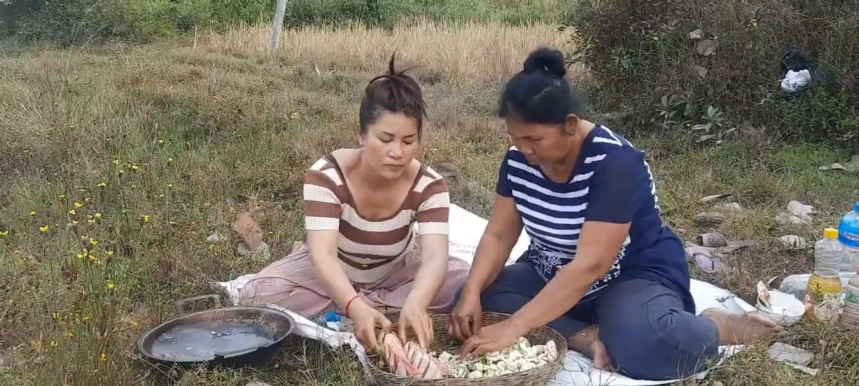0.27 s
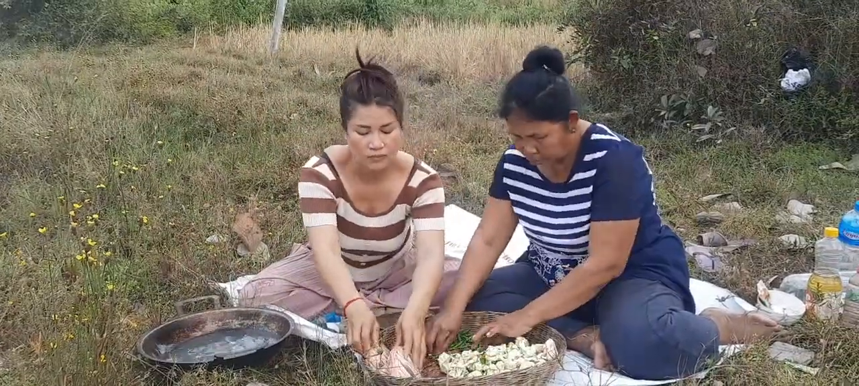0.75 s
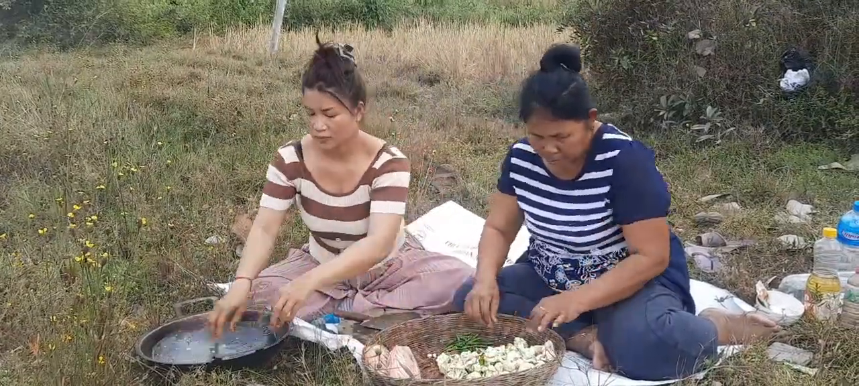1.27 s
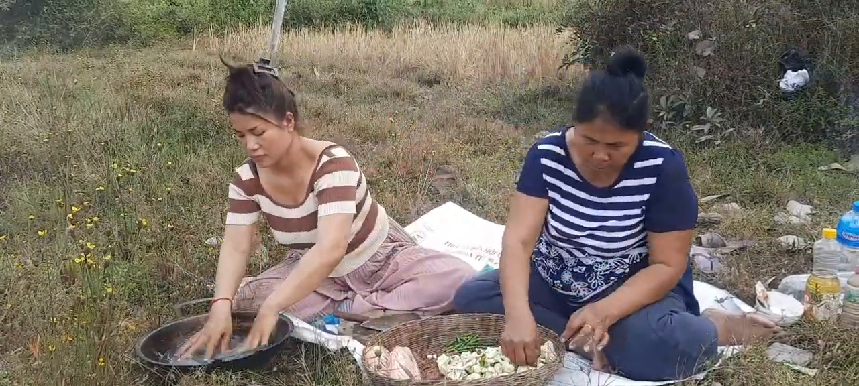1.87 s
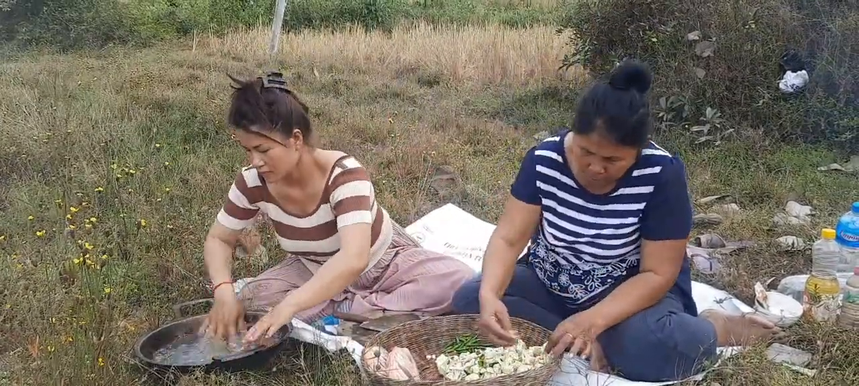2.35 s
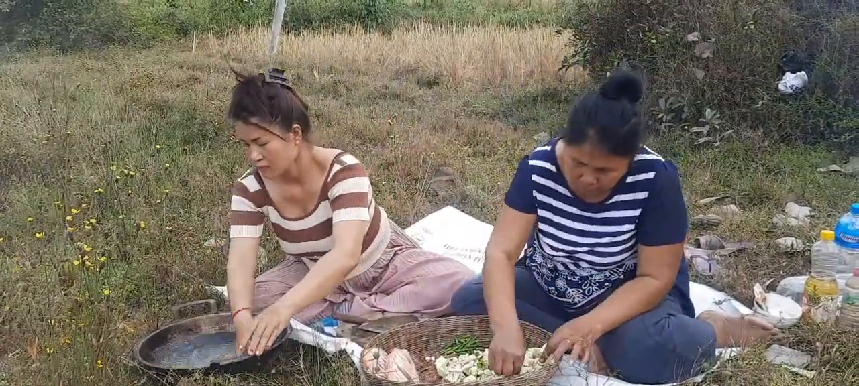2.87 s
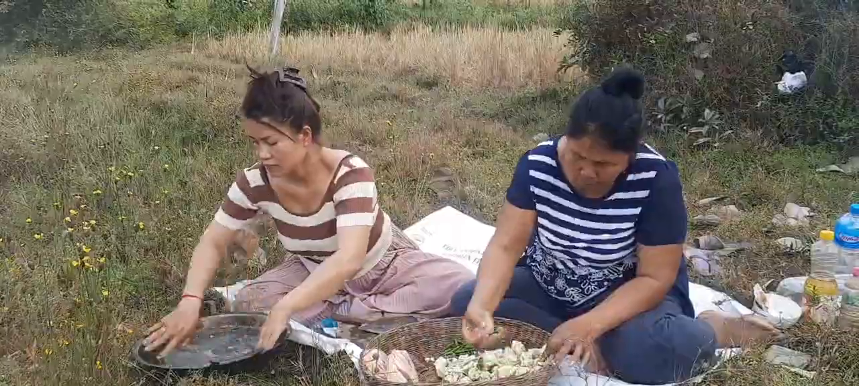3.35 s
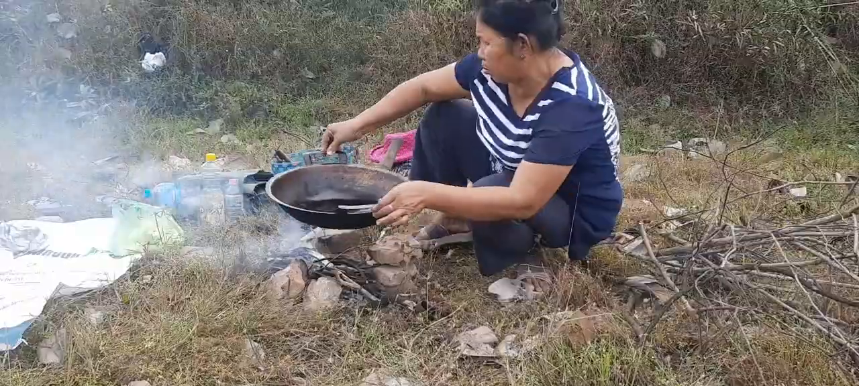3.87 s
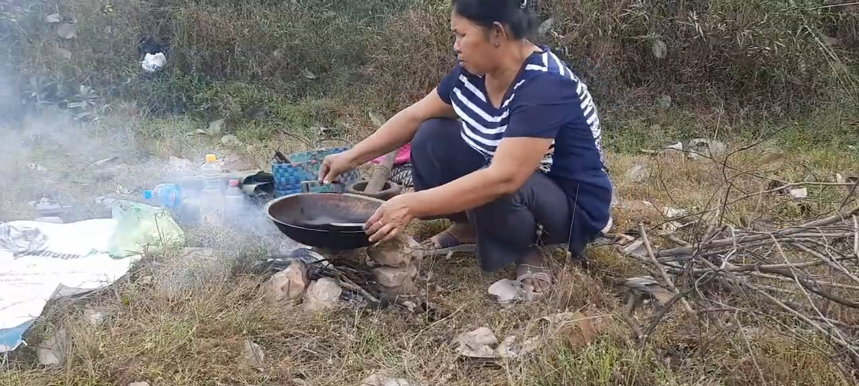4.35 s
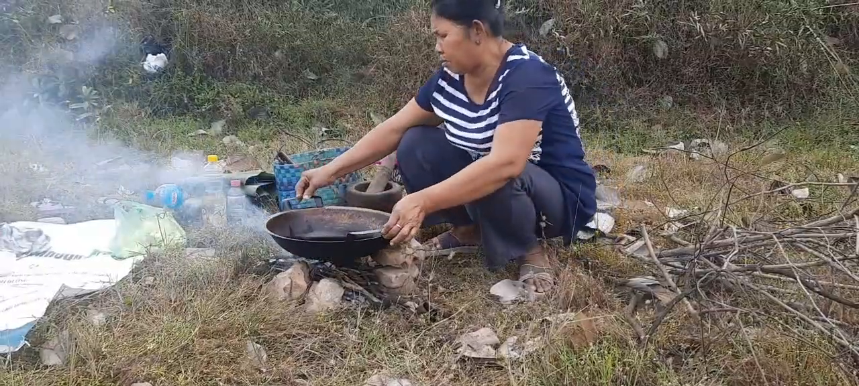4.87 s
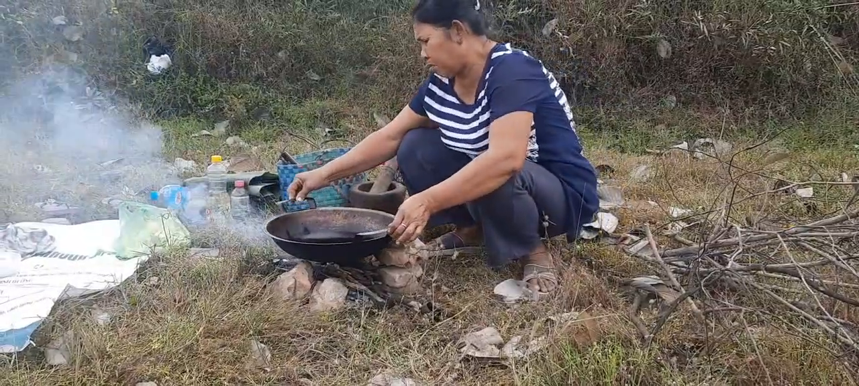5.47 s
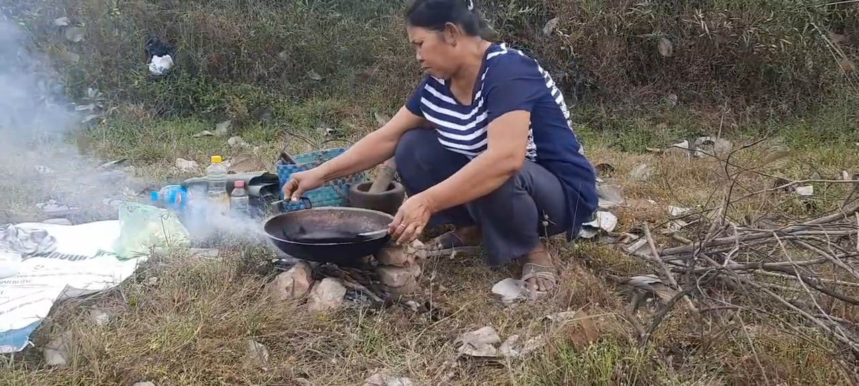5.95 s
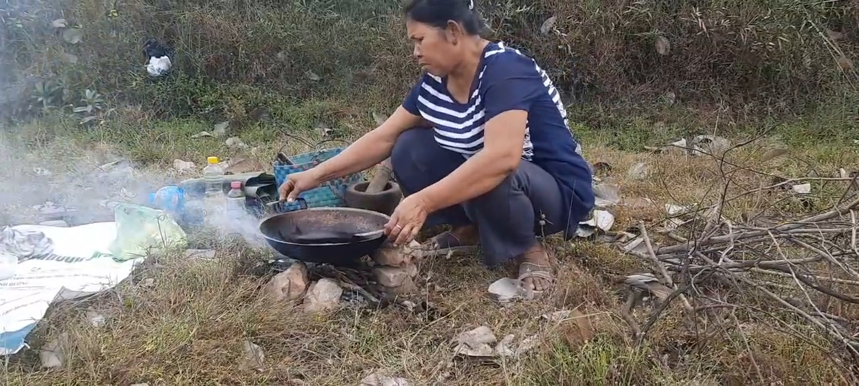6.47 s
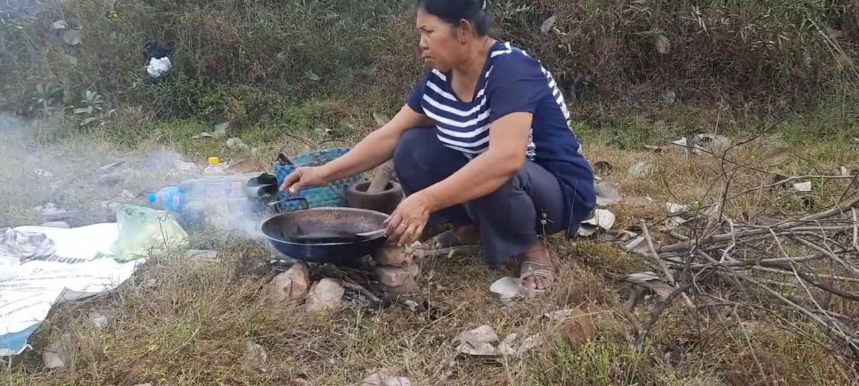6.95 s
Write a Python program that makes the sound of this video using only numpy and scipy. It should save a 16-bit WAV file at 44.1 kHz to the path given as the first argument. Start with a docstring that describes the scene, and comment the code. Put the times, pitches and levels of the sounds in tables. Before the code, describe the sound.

Faint splashing and a bird outdoors, then a small engine thuds nearby while a fire crackles and wind buffets the microphone.

```python
"""Outdoors in a field: hands wash food in a pan, ringing bubbles and the pan's modes, while a bird
whistles over a far hum. After a short silence a second scene begins: the exhaust pulses of a slow
single-cylinder engine thud nearby and swell, twigs crackle in a cooking fire, a pan is set down on
stones and one brief high chirp sounds. In both scenes turbulent wind buffets the microphone's
two ports and a cricket trills with fast wing strokes."""
import sys
import numpy as np
from scipy import signal
from scipy.fft import rfft, irfft
from scipy.io import wavfile
from scipy.ndimage import uniform_filter1d

SR = 44100
rng = np.random.default_rng(int(sys.argv[2]) if len(sys.argv) > 2 else 0)


def pcm_store(signal):
    """Save signal as 16-bit PCM."""
    levels = np.round(np.clip(np.atleast_2d(signal), -1, 1) * 32767)
    wavfile.write(sys.argv[1], SR, levels.astype(np.int16).T)


N = 318402
T = np.arange(N) / SR

HANDS_IN_S, FIRST_END_S, SECOND_START_S = 1.36, 3.7205, 3.7935
FIRST, SECOND = T < FIRST_END_S, T > SECOND_START_S
FIRING_HZ = 19.288
BARK_FROM, KNOCK_FROM, TICK_FROM = 9, 19, 45   # lowest order of each exhaust band
PORT_LAG_S = .00014   # sound from the left reaches the right port later
GUST_EDGE_DB = 21.5   # fall of a gust or flutter, one flank away from its peak
# Harmonic spectrum of the exhaust: order (multiple of the firing rate), relative_db
EXHAUST_ORDERS = [(1, -38), (2, -21), (3, -5), (4, -6), (5, -6), (6, 0), (7, -3), (8, 0), (9, -17),
                  (10, -13), (11, -9), (12, -17), (13, -17), (14, -11), (15, -15), (16, -16), (17, -20),
                  (18, -32), (19, -32), (20, -32), (21, -29), (22, -31), (23, -33), (24, -28), (25, -31),
                  (26, -35), (27, -38), (28, -40), (29, -40), (30, -36), (31, -29), (32, -33), (33, -29),
                  (34, -22), (35, -27), (36, -25), (37, -28), (38, -34), (39, -35), (40, -39), (41, -39),
                  (42, -38), (43, -38), (44, -40), (45, -42), (46, -40), (47, -44), (48, -39), (49, -39),
                  (50, -41), (51, -38), (52, -28), (53, -34), (54, -32), (55, -32), (56, -33), (57, -31),
                  (58, -34), (59, -33), (60, -33), (61, -33), (62, -37), (63, -37), (64, -30), (65, -38),
                  (66, -35)]


def amp(db):
    """Decibels to amplitude ratio."""
    return 10 ** (np.asarray(db) / 20)


def rms_one(x):
    """Normalise to unit rms."""
    return x / np.sqrt(np.mean(x ** 2) + 1e-20)


def in_time(rows):
    """Linear interpolation in time: one curve for each column after the first."""
    times, *columns = np.transpose(rows)
    return [np.interp(T, times, column) for column in columns]


def at_hz(points, hz):
    """Interpolation on a logarithmic frequency axis."""
    known_hz, values = np.transpose(points)
    return np.interp(np.log(hz), np.log(known_hz), values)


def drift(rate_hz):
    """Random modulation: low-passed noise of unit rms."""
    pole = np.exp(-80 * np.pi * rate_hz / SR)
    white = rng.standard_normal(N // 40 + 2002)
    slow = signal.lfilter([1], [1, -2 * pole, pole * pole], white)[2000:]
    return np.interp(np.arange(N) / 40, np.arange(len(slow)), rms_one(slow))


def panned(x, pan_db):
    """Level difference between channels; positive is to the left."""
    return np.array([x * amp(pan_db / 2), x * amp(-pan_db / 2)])


def filtered(x, hz, kind="low", order=2):
    """Maximally flat low-pass or high-pass filter."""
    return signal.sosfilt(signal.butter(order, hz, kind, fs=SR, output="sos"), x)


def noise(spectrum, coherence=None):
    """Coloured stereo noise; by default the coherence of the ports falls with frequency."""
    # Likeness of the sound at the two ports: frequency_hz, coherence
    port_coherence = [(60, .97), (290, .95), (640, .75), (1400, .55), (3000, .45), (6000, .4), (15000, .25)]
    # Level difference between the ports: frequency_hz, pan_db
    port_balance = [(60, -2), (180, 11.5), (550, 4.5), (1650, 2.5), (4970, -0.5), (15000, -2.5)]
    hz = np.maximum(np.arange(N // 2 + 1) * SR / N, 1)
    mid, side = rfft(rng.standard_normal((2, N))) * amp(at_hz(spectrum, hz))
    if coherence is None:
        alike = np.clip(at_hz(port_coherence, hz), 0, 1)
        mid, side = np.sqrt(1 + alike) * mid, np.sqrt(1 - alike) * side
        lean = amp(at_hz(port_balance, hz) / 2)
        delay = np.exp(-2j * np.pi * hz * PORT_LAG_S)
        return rms_one(irfft([(mid + side) * lean, (mid - side) / lean * delay], N))
    mid, side, alike = irfft(mid, N), irfft(side, N), np.clip(coherence, 0, 1)
    return rms_one(np.sqrt(1 + alike) * mid + np.sqrt(1 - alike) * side * [[1], [-1]])


def add(out, start_s, piece):
    """Superpose a short sound on the output."""
    i = int(start_s * SR)
    out[..., i:i + piece.shape[-1]] += piece[..., :N - i]


def resonate(x, hz, width_hz, stages=1):
    """Two-pole resonators in cascade, with unit gain at the peak."""
    r = np.exp(-np.pi * width_hz / SR)
    feedback = [1, -2 * r * np.cos(2 * np.pi * hz / SR), r * r]
    for _ in range(stages):
        x = signal.lfilter([(1 - r * r) / 2, 0, (r * r - 1) / 2], feedback, x)
    return x


def held(rows, fall_db_per_s, attack_s=.026):
    """Envelopes that rise, hold and decay, summed in power; rows of start_s, length_s, level_db."""
    power = 0
    for start_s, length_s, db in rows:
        onset = np.clip((T - start_s) / attack_s + 1, 0, 1)
        power += (onset * amp(db - fall_db_per_s * np.maximum(T - start_s - length_s, 0))) ** 2
    return np.sqrt(power)


def damped_sine(hz, cycles, rise, attack_cycles):
    """A damped oscillator: it loses 60 dB over its cycles while its pitch climbs by the share 2 * rise."""
    t = np.arange(int(cycles / hz * SR)) / SR
    envelope = np.exp(-np.log(1000) * t * hz / cycles) * np.minimum(t * hz / attack_cycles, 1)
    return envelope * np.sin(2 * np.pi * hz * (t + rise * t * t * hz / cycles))


def engine():
    """Periodic firing drives exhaust and clatter, which swell as the wind carries the sound over."""
    # Swell and levels of the pipe note (order 8) and low note (order 6): time_s, swell_db, note_db, low_db
    carried_levels = [(3.79, -5, -46, -47), (4.2, -4, -44.5, -49), (4.64, -4, -44.5, -49),
                      (4.8, 1, -44.5, -44.5), (5.25, 5, -35.5, -41), (5.56, 7, -36, -37),
                      (5.8, 6, -45, -38.5), (6.05, 4, -40, -39), (6.3, 2.2, -38, -44), (6.6, 3, -44, -38.5),
                      (6.78, 2.5, -39, -37), (7.05, 1.5, -41, -40), (7.22, 2, -38, -45)]
    # Strength of the exhaust knock: time_s, level_db
    knock_levels = [(3.79, -60), (4.4, -62), (4.75, -64), (5.25, -56), (5.75, -54), (5.97, -61), (6.3, -65),
                    (7.22, -66)]
    swell_db, note_db, low_db = in_time(carried_levels)
    bands = {   # orders, level_db
        "deep": (range(1, 5), -54 + 1.12 * swell_db),
        "boom": ((5, 7), -46.5 + .9 * swell_db),
        "low note": ((6,), low_db),
        "pipe note": ((8,), note_db),
        "bark": (range(BARK_FROM, KNOCK_FROM), -47 + .6 * swell_db),
        "knock": (range(KNOCK_FROM, TICK_FROM), in_time(knock_levels)[0]),
        "tick": (range(TICK_FROM, 67), -64 + .76 * swell_db)}
    cycles = (T - 4.3179) * FIRING_HZ + .0008 * drift(3)   # a whole number at each firing
    metal = amp(-53.5 + .64 * swell_db) * clatter(cycles)
    pipe = panned(exhaust(cycles, bands), 1.0)
    pipe[1] = np.roll(pipe[1], int(PORT_LAG_S * SR))
    return pipe + metal


def exhaust(cycles, bands):
    """A pulse train is a harmonic series; each order wavers in level, the higher ones more in phase."""
    waver = [drift(3) for _ in range(9)]
    scatter = rng.standard_normal(len(EXHAUST_ORDERS))   # ground echoes blur the top of the pulse
    harmonics = {}
    for (k, db), phase, blur in zip(EXHAUST_ORDERS, exhaust_phases(), scatter):
        jitter = .005 * k * waver[(k + 4) % 9] + .012 * k * blur
        harmonics[k] = amp(db + 1.5 * waver[k % 9]) * np.cos(2 * np.pi * k * cycles + phase + jitter)
    uneven = amp(1.6 * drift(15))   # no two firings knock alike
    out = 0
    for name, (orders, level_db) in bands.items():
        band = sum(harmonics[k] for k in orders)
        if name in ("knock", "tick"):
            band *= uneven
        out += amp(level_db) * rms_one(band)
    return out


def exhaust_phases(size=4096, bins_per_order=16):
    """Phase of each order, in radians: a minimum-phase pulse, dispersed by the pipe."""
    orders, db = np.transpose([(0, -60)] + EXHAUST_ORDERS + [(80, -60)])
    spectrum_db = np.interp(np.arange(size // 2 + 1) / bins_per_order, orders, db)
    cepstrum = irfft(np.log(amp(spectrum_db)), size)
    cepstrum[1:size // 2] *= 2   # folding onto positive time gives minimum phase
    cepstrum[size // 2 + 1:] = 0
    period = size / bins_per_order
    with_intake = cepstrum.copy()
    with_intake[int(.26 * period):int(.43 * period)] *= -1   # the intake thumps ahead of each firing
    k = orders[1:-1]
    intake_phase, causal_phase = rfft([with_intake, cepstrum]).imag[:, (bins_per_order * k).astype(int)]
    pulse = np.where((k >= BARK_FROM) & (k < TICK_FROM), intake_phase, causal_phase)
    sixth_lag_s, knock_lag_cycles = .022, .058
    dispersion = np.pi * FIRING_HZ * sixth_lag_s * 6 ** 3 / k ** 2   # delay falls as the order cubed
    pulse = pulse + dispersion - 1.73 - .18 * np.maximum(k - 20, 0)   # the high orders come late
    knock = -2 * np.pi * k * knock_lag_cycles   # linear phase: these orders peak together
    return np.where((k >= KNOCK_FROM) & (k < TICK_FROM), knock, pulse)


def clatter(cycles):
    """Impacts excite the resonances of casing and valve, while meshing gear teeth whine."""
    # Spectrum of the mechanical noise: frequency_hz, density_db
    spectrum = [(190, -6), (330, -2), (359, -8), (473, -12), (551, -18), (650, -11), (881, -19.5),
                (1030, -17.5), (1330, -10.5), (1490, -11), (2630, -15.5), (3020, -17.5), (3870, -23),
                (6460, -28.5), (9000, -37.5), (11700, -111), (19800, -120)]
    # Casing resonances: pitch_hz, width_hz, relative_db
    casing_modes = [(1050, 99, 2.5), (1530, 55, 1.5), (1960, 220, -5.5), (2380, 110, -7), (2990, 106, -1)]
    # Tooth whine: order, relative_db
    gear_orders = [(52, -21), (104, -17), (156, -19.5)]
    # Ringing of the valve: pitch_hz, relative_db, t60_s, rise_s
    valve_modes = [(1156, 12, 0.029, 0.0097), (1450, -3.5, 0.079, 0.0041), (1660, -6, 0.061, 0.0054)]
    throb = amp(.27 * np.cos(4 * np.pi * (cycles - .06)) + 1.1 * drift(21))   # valves shut twice a cycle
    rattle = noise(spectrum) * throb
    casing = sum(amp(db + 1.5 * drift(5)) * resonate(rattle, hz, width) for hz, width, db in casing_modes)
    whine = sum(amp(db + .55 * drift(22)) * np.sin(2 * np.pi * k * (cycles + .0012 * drift(6.1)))
                for k, db in gear_orders)
    since_s = (cycles - .49) % 1 / FIRING_HZ   # one valve clacks shut mid-cycle
    clack = resonate(noise(spectrum), hz=1700, width_hz=850)
    clack *= amp(-60 * since_s / .07 + 2.2 * drift(4.9)) * np.minimum(since_s / .0015, 1)
    ring = 0
    for hz, db, t60_s, rise_s in valve_modes:
        envelope = amp(db - 60 * since_s / t60_s + 1.9 * drift(8)) * np.minimum(since_s / rise_s, 1) ** 2
        ring += envelope * np.sin(2 * np.pi * hz * since_s)
    noisy = amp(-14) * rms_one(clack) + amp(-.5) * rms_one(rattle) + amp(-7.5) * rms_one(casing)
    return noisy + panned(ring, 1.2) + panned(whine, 1.9)


def washing():
    """Hand strokes trap air as bubbles, force the pan's modes and throw spray."""
    # Hand strokes through the water: start_s, length_s, slosh_db, spray_db
    strokes = [(1.415, 0.13, -65.5, -70.5), (1.638, 0.022, -63.5, -71.5), (1.755, 0.013, -84, -75),
               (1.98, 0.21, -68.5, -63), (2.133, 0.14, -56.5, -61.5), (2.333, 0.18, -59.5, -60.5),
               (2.592, 0.016, -57, -66), (2.662, 0.016, -50.5, -69), (2.77, 0.26, -78, -68),
               (3.193, 0.19, -72, -67.5)]
    slosh = held([row[:3] for row in strokes], fall_db_per_s=251)
    slosh += amp(-82.5) * (T > HANDS_IN_S)   # water settles between strokes
    mist = held([(s, length, db) for s, length, _, db in strokes], fall_db_per_s=60)
    mist += amp(-68)   # a constant fine rustle
    loud, crowd = gurgles(), small_bubbles()
    basin, shimmer = pan_resonance()
    water = amp(-4) * crowd + amp(-3.5) * basin
    return loud + slosh * water + mist * (spray() + amp(-10) * shimmer)


def gurgles():
    """Bubble resonance: each loud bubble breaks into three, whose pitch climbs near the surface."""
    # Loud bubbles: start_s, level_db, pitch_hz
    bubbles = [(1.371, -57, 2300), (1.397, -60, 2220), (1.43, -49.5, 565), (1.424, -48, 891),
               (1.6, -49, 750), (1.975, -50, 797), (2.805, -54, 754), (1.484, -41, 1300),
               (1.514, -42.5, 963), (1.629, -43, 1220), (1.696, -52, 1370), (1.75, -45.5, 1485),
               (1.945, -44, 1660), (1.974, -44, 2030), (2.112, -36, 681), (2.128, -41, 802),
               (2.142, -43, 1000), (2.19, -49, 1050), (2.2, -44, 1330), (2.172, -37, 845),
               (2.227, -41, 671), (2.273, -44, 477), (2.346, -50, 1250), (2.379, -37.5, 1240),
               (2.412, -43.5, 497), (2.437, -59, 505), (2.495, -41, 1200), (2.548, -49, 509),
               (2.563, -43.5, 1018), (2.656, -35.5, 888), (2.871, -52, 790), (2.913, -42.5, 1340),
               (3.072, -52, 1450), (3.185, -48, 1410), (3.23, -41, 1850), (3.343, -48, 746),
               (3.365, -53.5, 562)]
    fragments = [(s + k * .013, db - k * 3, hz) for s, db, hz in bubbles for k in range(3)]
    out = np.zeros((2, N))
    for (start_s, db, hz), (climb, side, detune) in zip(fragments, rng.random((len(fragments), 3))):
        pitch_hz = hz * (1 + .04 * (detune - .5))
        tone = damped_sine(pitch_hz, cycles=53.5, rise=.187 * (.5 + climb), attack_cycles=9)
        churn = rms_one(uniform_filter1d(rng.standard_normal(len(tone)), size=120))
        add(out, start_s, panned(amp(db) * tone * (1 + .5 * churn), 3 * (.5 + side)))
    return out


def small_bubbles():
    """Many small bubble resonances, spread over three octaves, merge into a wash."""
    out = np.zeros((2, N))
    for when, pitch, faintness, side in rng.random((1800, 4)):
        tone = damped_sine(600 * 8.0 ** pitch, cycles=58.3, rise=.342, attack_cycles=6.6)
        start_s = HANDS_IN_S + when * (FIRST_END_S - HANDS_IN_S)
        add(out, start_s, panned(amp(-16 * faintness - 6 * pitch) * tone, 7 * (side - .5)))
    return rms_one(out)


def pan_resonance():
    """Forced vibration of the pan under slapping water: all its modes, and the high ones alone."""
    # Modes of the water-filled pan: pitch_hz, width_hz, relative_db
    basin_modes = [(486, 87, -22), (563, 56, 1), (790, 32, 6), (976, 91, 3.5), (1370, 400, 7),
                   (1830, 73, 4), (2590, 180, 0.5), (3420, 120, -9.5), (4000, 47, -7.5), (4660, 150, -6.5)]
    slap = rng.standard_normal(N) + .5 * rng.standard_normal((2, N))
    modes = [amp(db) * amp(3.5 * drift(16)) * resonate(slap, hz, width, stages=2) / np.sqrt(width)
             for hz, width, db in basin_modes]
    shimmer = sum(mode for mode, (hz, _, _) in zip(modes, basin_modes) if hz > 2200)
    return rms_one(sum(modes)), rms_one(shimmer)


def spray():
    """Random amplitude modulation makes three bands of noise patter like fine drops."""
    # Spectrum of the spray: frequency_hz, density_db
    spectrum = [(1180, -8.5), (2000, -9.5), (2220, -2.5), (2570, -6), (2850, -7), (4670, -4.5), (9820, -20),
                (14000, -19.5), (15800, -26)]
    hiss, together = noise(spectrum, coherence=.053), drift(28)
    low, low_and_mid = filtered(hiss, 3200), filtered(hiss, 6000)
    bands = low, low_and_mid - low, hiss - low_and_mid
    patter = sum(band * amp(1.5 * together + 2.5 * drift(28)) for band in bands)
    return rms_one(patter * amp([[-1.5], [1.5]]))


def snaps():
    """Brief transients are broadband: each splash or snap has a resonant body and a bright top."""
    # Splashes and snaps of twigs and fire: start_s, level_db, centre_hz, top_db, pan_db
    transients = [(0.107, -51, 5500, -19, 8), (0.107, -52, 2460, -32, 8), (0.157, -44.5, 5000, -16, -1),
                  (0.157, -47, 2240, -33, 5), (0.181, -47.5, 5270, -19, 1.5), (.248, -52, 2200, -27, 7),
                  (.2643, -49, 1900, -20, 3), (1.533, -45.5, 3720, -23, 1), (1.6842, -47, 5020, -19, -1),
                  (1.787, -49, 3950, -15, 4), (1.8868, -42, 4100, -17, 5), (1.9065, -41, 3660, -14, 0),
                  (2.0074, -45, 5570, -22, -1), (2.126, -46, 4700, -20, 2), (2.147, -41.5, 4100, -20, 3),
                  (2.167, -40, 2620, -25, 7), (2.18, -38.5, 4900, -15, 0), (2.242, -40, 2400, -20, 10),
                  (2.412, -46, 4930, -17, 0), (2.421, -37.5, 3700, -22, -1), (2.432, -36.5, 4740, -25, 1),
                  (2.454, -41, 2450, -25, -3), (2.468, -42, 4420, -11, 4), (2.582, -34.5, 3420, -15.5, 1),
                  (2.592, -42.5, 5700, -14, -2), (2.636, -43, 5270, -10, 0), (2.658, -43, 5540, -6, -4),
                  (2.658, -48, 3200, -25, 2), (2.696, -46, 5100, -29, -5), (2.869, -47, 4730, -20, 4),
                  (3.18, -48, 4520, -19, 2), (3.221, -43.5, 4600, -20, 1), (3.3443, -42.5, 3980, -18, 4),
                  (3.39, -44, 5740, -11, -5), (3.867, -42, 4900, -23, -14), (3.913, -37.5, 6550, -17, -3),
                  (3.916, -41, 2100, -30, -1), (3.9824, -48, 4540, -20, -1), (4.002, -42, 2400, -30, 3),
                  (4.03, -42, 2180, -30, 1), (3.959, -38.5, 5860, -0.5, -4),
                  (3.9908, -37.5, 6800, -19, -1.2), (3.999, -34.5, 4600, -26, -8),
                  (4.0338, -36.5, 7200, 3, -2), (4.119, -44, 3860, -32, -3), (4.1699, -46, 7500, -7, -9),
                  (4.2484, -44, 6700, -43.5, -4), (4.387, -43.5, 4200, -38, -2),
                  (4.4755, -34.5, 5600, -6, -3), (4.747, -40.5, 6600, -8, -3),
                  (4.9294, -42.5, 6950, -7, -4), (5.6054, -48, 6670, -15, -4),
                  (5.9124, -30.5, 6600, -38, -4), (5.917, -40, 3300, -30, 0),
                  (6.0567, -39.5, 4300, -22, -1), (6.057, -50, 7250, -20, -1)]
    droplets = [(HANDS_IN_S + when * (FIRST_END_S - HANDS_IN_S), -53 - 5 * faintness,
                 3500 + 3000 * pitch, -22, -1.5) for when, faintness, pitch in rng.random((12, 3))]
    out, t = np.zeros((2, N)), np.arange(1800) / SR
    attack_s, t60_s = .001, .022
    envelope = amp(-60 * t / t60_s) * np.minimum(t / attack_s, 1)
    for start_s, db, hz, top_db, pan_db in transients + droplets:
        burst = rng.standard_normal((2, len(t))) * envelope
        body = resonate(burst[0] + 3.1 * burst, hz, width_hz=1010)
        if HANDS_IN_S < start_s < FIRST_END_S:
            body = resonate(body, hz, width_hz=900)   # water sounds rounder than wood
        bright = filtered(burst, 9000, "high")
        snap = body / np.abs(body).max() + amp(top_db) * bright / np.abs(bright).max()
        add(out, start_s, amp(db) * snap * panned(np.ones(1), pan_db))
    return out


def pan_knocks():
    """Free vibration: each blow on the stones rings the pan's heavily damped modes."""
    # Blows on the stones: start_s, peak_db
    blows = [(4.296, -36.5), (4.98, -27.5), (5.301, -36), (5.729, -34.5)]
    # Modes of the struck pan: pitch_hz, relative_db, t60_s
    modes = [(325, 0, .05), (470, -3, .05), (265, -6, .05)]
    out, t = np.zeros(N), np.arange(4000) / SR
    ring = sum(amp(db - 60 * t / t60) * np.sin(2 * np.pi * hz * t) for hz, db, t60 in modes)
    for start_s, db in blows:
        add(out, start_s, amp(db) * ring / np.abs(ring).max())
    return panned(out, 2.5)


def fire():
    """Burning twigs give broadband hiss; flaring sap adds a sizzle with a resonant peak."""
    # Spectrum of the hiss: frequency_hz, density_db
    spectrum = [(2500, 4), (4000, 3.5), (7300, -6), (8600, -23), (10000, -14.5), (12500, -12), (15000, -15),
                (15700, -29)]
    # Strength of the hiss: time_s, level_db
    levels = [(3.79, -59.5), (4.1, -60), (4.8, -60), (5.3, -60), (6.1, -55.5), (6.64, -70), (7.22, -66.5)]
    # Sap flares: start_s, length_s, level_db
    flares = [(3.86, 0.066, -58.5), (3.98, 0.038, -59), (5.905, 0.0086, -56)]
    hiss = rms_one(noise(spectrum) * amp(2.56 * drift(23)))
    sizzle = rms_one(hiss + amp(9) * resonate(hiss, hz=7500, width_hz=1220))
    return amp(in_time(levels)[0]) * hiss + held(flares, fall_db_per_s=152) * sizzle


def wind():
    """Turbulent pressure at the ports rumbles; the breeze and one-sided gusts add in power."""
    # Turbulence spectra of the first and second scene: frequency_hz, density_db
    first_spectrum = [(15, -23), (25, -45), (49, 1.5), (69, 1), (121, -0.5), (208, -13.5), (312, -13),
                      (515, -54.5), (700, -44), (910, -44.5), (1540, -120)]
    second_spectrum = [(20, -38), (36, -18), (62, 0), (100, -7), (150, -13), (200, -20), (310, -25),
                       (420, -45), (900, -110)]
    # Rumble shared by both ports: time_s, coherence
    shared_rumble = [(0, 0.4), (1.3, 0.5), (2.0, 0.96), (3.7, 1), (7.22, 0.98)]
    # Strength of the breeze: time_s, level_db
    breeze_levels = [(0, -58.5), (1.2, -65.5), (1.9, -65), (2.4, -56), (3.72, -55), (3.79, -50.5),
                     (4.75, -49.5), (5.16, -41.5), (5.7, -37.5), (5.9, -36.5), (6.5, -43.5), (6.75, -43.5),
                     (7.22, -39.5)]
    # Gusts: peak_s, peak_db, pan_db, flank_s
    gusts = [(0.08, -52, -3, 0.046), (0.253, -38.5, 0.5, 0.043), (0.427, -42, -3, 0.18),
             (0.617, -48, -20.5, 0.031), (0.78, -41.5, 0.5, 0.084), (0.866, -39.5, -4, 0.034),
             (1.02, -42, -11, 0.14), (1.29, -51, -5, 0.13), (1.46, -47.5, -4, 0.16), (1.683, -45, -9, 0.24),
             (2.018, -42.5, -5.5, 0.096), (2.301, -44, -5, 0.11), (2.799, -38.5, -2, 0.022),
             (3, -43, .7, 0.036), (5.408, -54, -5, 0.28), (5.91, -37.5, 8, 0.13), (6.93, -34.5, 2.5, 0.15)]
    breeze = panned(amp(in_time(breeze_levels)[0] + 3 * drift(2.3)), -3 * FIRST)
    gust_power = sum(panned(amp(db - GUST_EDGE_DB * np.abs(T - peak_s) / flank_s), pan_db) ** 2
                     for peak_s, db, pan_db, flank_s in gusts)
    coherence = in_time(shared_rumble)[0]
    lumps = amp(np.array([2.3 * drift(16.3), 3.1 * drift(8.1)]) + 1.7 * drift(32) * FIRST)
    air = np.where(FIRST, noise(first_spectrum, coherence), noise(second_spectrum, coherence))
    calm = np.clip((T - 1.2) / .3, 0, 1) * FIRST   # the buffeting eases and turns duller
    air += calm * (filtered(air, 110) - air)
    return rms_one(air * lumps) * np.sqrt(breeze ** 2 + gust_power)


def wind_pops():
    """Pressure pulses on the ports die away within a few oscillations."""
    # Pops and thumps: start_s, peak_db, pitch_hz, pan_db
    pulses = [(.34, -37, 75, 0), (.41, -31, 66, 0), (.608, -40, 105, -14), (.666, -52, 520, -16),
              (.683, -51, 430, -16), (.698, -57, 750, -16), (.705, -47, 690, -16), (.982, -39, 140, -8),
              (1.035, -37, 68, -6)]
    out = np.zeros((2, N))
    for start_s, db, hz, pan_db in pulses:
        blip = damped_sine(hz, cycles=7, rise=0, attack_cycles=1.3)
        add(out, start_s, panned(amp(db) * blip / np.abs(blip).max(), pan_db))
    return out


def wind_flutter():
    """Unsteady flow flaps across the right port, swelling and breaking off."""
    # Spectrum of the flapping: frequency_hz, density_db
    spectrum = [(300, 3), (420, 1), (700, -0.5), (1200, -6.5), (2000, -27), (3000, -38)]
    # Flutters: peak_s, gain_db, rise_s, fall_s, cutoff_hz
    flutters = [(.175, -58, 0.08, 0.043, 1100), (.21, -57, .03, 0.032, 1300),
                (.262, -61.5, 0.026, 0.12, 900), (.44, -63, 0.21, 0.12, 600),
                (.63, -45.5, 0.028, 0.028, 420), (0.711, -52, 0.077, 0.012, 1500),
                (.38, -53, .03, 0.055, 450), (.77, -73, .05, 0.053, 398), (.86, -64, 0.051, 0.038, 398),
                (.945, -61, 0.026, 0.027, 400), (.99, -60, 0.027, 0.1, 428), (1.07, -54, 0.068, 0.04, 414)]
    flap = noise(spectrum, coherence=0) * amp([[-9], [2.5]]) * amp(3.5 * drift(40))
    out = 0
    for peak_s, db, rise_s, fall_s, cutoff_hz in flutters:
        flanks_away = np.maximum((peak_s - T) / rise_s, (T - peak_s) / fall_s)
        out += amp(db - GUST_EDGE_DB * flanks_away) * filtered(flap, cutoff_hz, order=4)
    return out


def bird_and_chirp():
    """Gliding tones, mostly falling; fast amplitude modulation adds hoarse sidebands."""
    # Bird whistles, then one brief high chirp: start_s, length_s, from_hz, to_hz, level_db, hoarseness
    glides = [(0.775, 0.066, 2880, 2510, -59.5, 1.05), (0.918, 0.04, 2480, 2580, -57.5, 0.34),
              (0.941, 0.055, 2780, 2420, -58, 0.7), (1.044, 0.064, 2800, 2440, -50, 0.4),
              (1.131, 0.075, 2830, 2470, -57.5, 0.97), (1.198, 0.035, 2790, 2450, -62.5, 0.7),
              (1.34, .11, 2540, 2144, -60, 0.1), (1.901, 0.13, 2440, 2054, -61, 0.1),
              (1.963, 0.028, 2710, 2340, -52, 0.26), (6.108, 0.024, 4130, 4180, -53, 0.2)]
    out = np.zeros(N)
    for start_s, length_s, from_hz, to_hz, db, hoarseness in glides:
        progress = np.linspace(0, 1, int(length_s * SR))
        white = rng.standard_normal(len(progress))
        flutter = rms_one(uniform_filter1d(uniform_filter1d(white, size=80), size=80))
        roughness = 1 - min(hoarseness, 1) + hoarseness * flutter
        tone = np.sin(2 * np.pi * np.cumsum(from_hz + (to_hz - from_hz) * progress) / SR)
        add(out, start_s, amp(db) * np.sin(np.pi * progress) * tone * roughness)
    return panned(out, 5.8)


def cricket():
    """Stridulation: fast wing strokes gate noise into three high resonances."""
    # Trills: start_s, level_db
    trills = [(-.04, -80), (.62, -79.5), (1.3, -83), (2.68, -81), (3.445, -79), (4.27, -85), (4.94, -76.5),
              (5.64, -74.5), (6.35, -75), (7.08, -75.5)]
    trill_s, stroke_hz, modes_hz = .455, 132, (10650, 11050, 11450)
    gate = sum(amp(db) * np.clip(np.minimum((T - start_s) / .066, (start_s + trill_s - T) / .03), 0, 1)
               for start_s, db in trills)
    strokes = (.5 + .5 * np.sin(2 * np.pi * stroke_hz * T)) ** .93
    scrape = rng.standard_normal((2, N)) * strokes
    ring = sum(resonate(scrape, hz, width_hz=300, stages=2) for hz in modes_hz)
    return gate * rms_one(ring) * amp([[-1.5], [1.5]])


def far_motor():
    """Narrow-band noise in a few resonances is heard as a distant, growing hum."""
    # Resonances of the hum: pitch_hz, width_hz, relative_db
    modes = [(66.5, 15.6, -3), (120.8, 7.4, -1.5), (199, 31, -13), (309.8, 28, -15.5)]
    # Strength of the hum: time_s, level_db
    levels = [(0, -65), (1.6, -62), (2.6, -58.5), (3.72, -51.5)]
    white = rng.standard_normal(N)
    hum = sum(amp(db) * rms_one(resonate(white, hz, width, stages=2)) for hz, width, db in modes)
    return panned(amp(in_time(levels)[0]) * rms_one(hum), 0)


def field_air():
    """Ambient noise of the open field, almost incoherent between the ports."""
    # Spectrum of the still air: frequency_hz, density_db
    spectrum = [(180, -10), (300, -2.5), (633, -24), (1380, -16), (2350, -14), (3400, -19.5), (4480, -16.5),
                (6450, -14.5), (9610, -32.5), (11200, -24), (12100, -37), (14500, -26), (15800, -63)]
    return amp(-65.5) * noise(spectrum, coherence=.023)


def scene():
    """Two scenes, washing and then engine and fire, with a short silence between them."""
    air = field_air()
    both = wind() + snaps() + bird_and_chirp() + cricket() + pan_knocks()
    first = both + air + washing() + wind_flutter() + wind_pops() + far_motor()
    second = both + engine() + fire()
    return first * FIRST + second * SECOND


def record(dry):
    """Band limiting removes the lowest bass and the highest treble."""
    treble_cut = signal.cheby2(16, 45, 16100, fs=SR, output="sos")
    return signal.sosfilt(treble_cut, filtered(dry, 28, "high"))


dry = scene()
out = record(dry)
pcm_store(out)
```